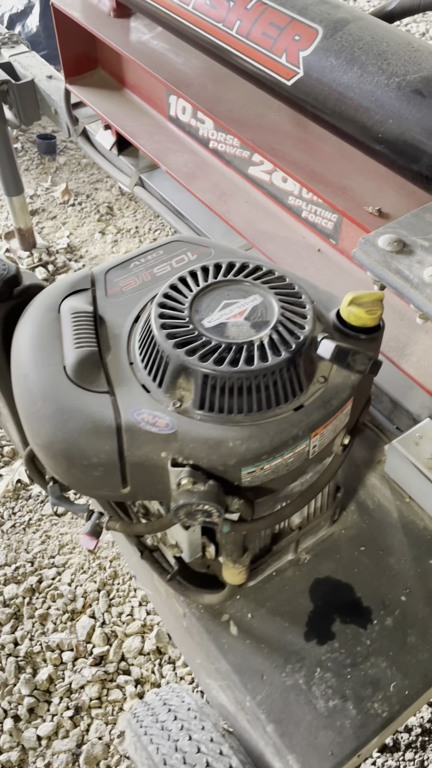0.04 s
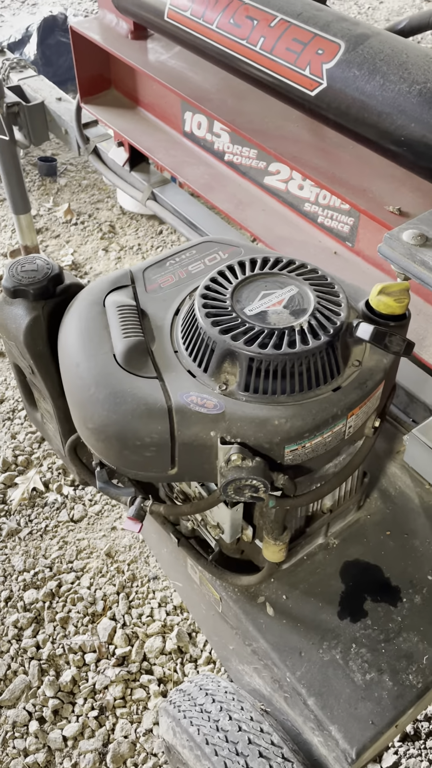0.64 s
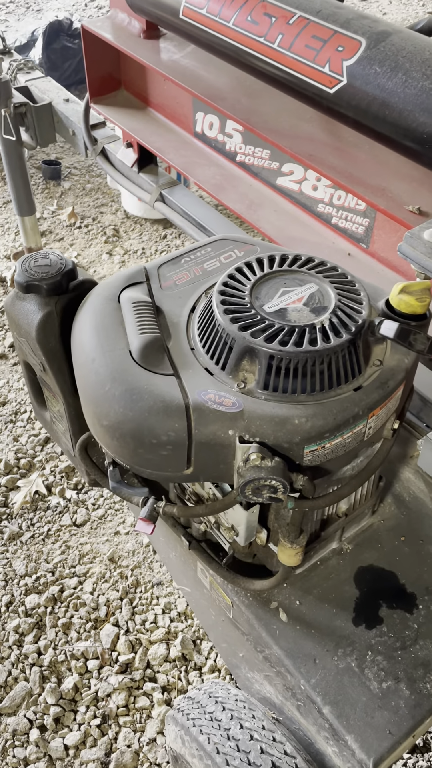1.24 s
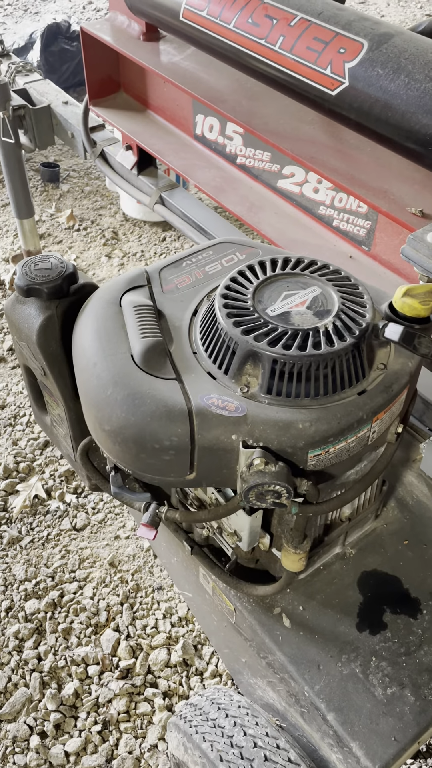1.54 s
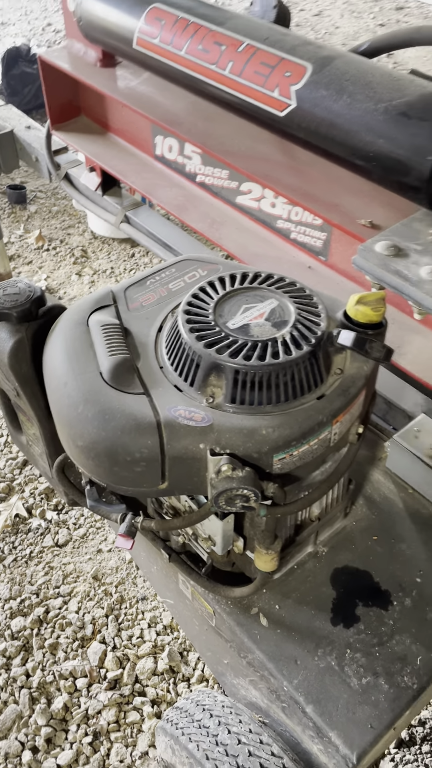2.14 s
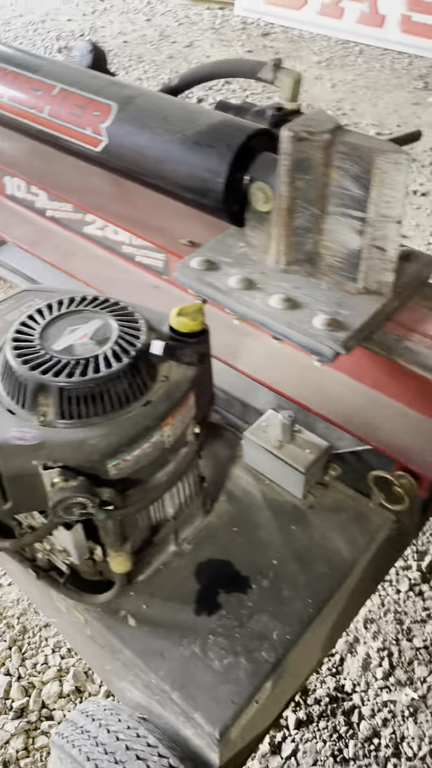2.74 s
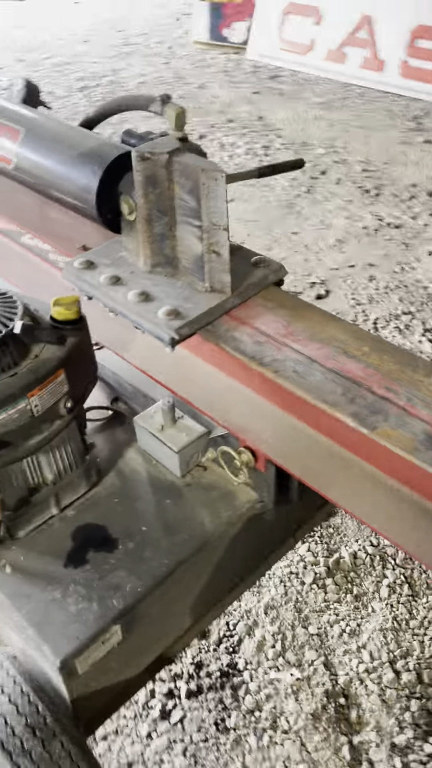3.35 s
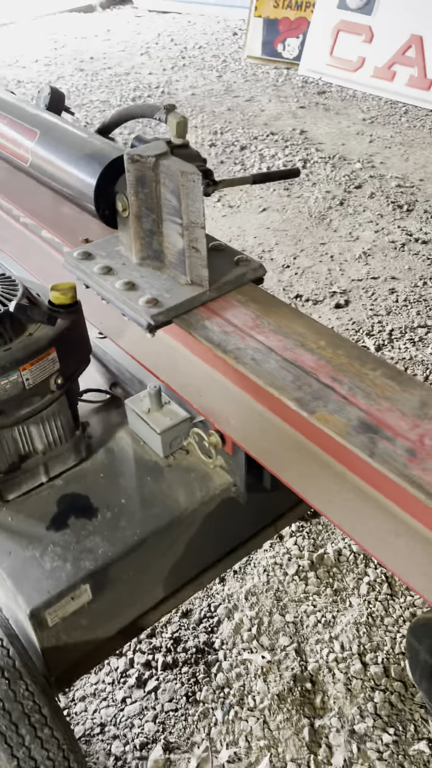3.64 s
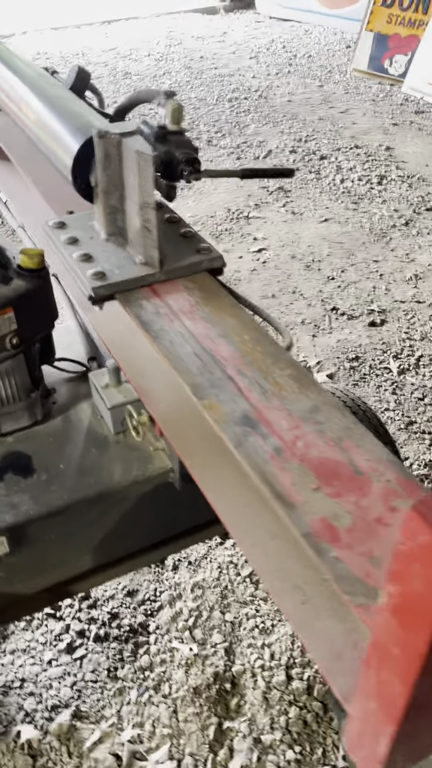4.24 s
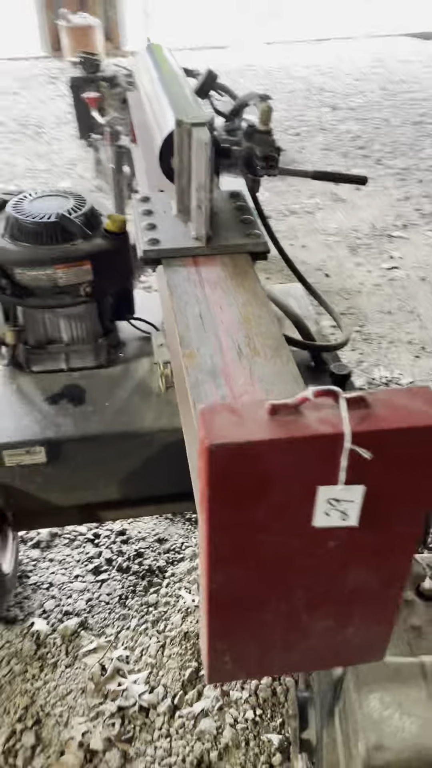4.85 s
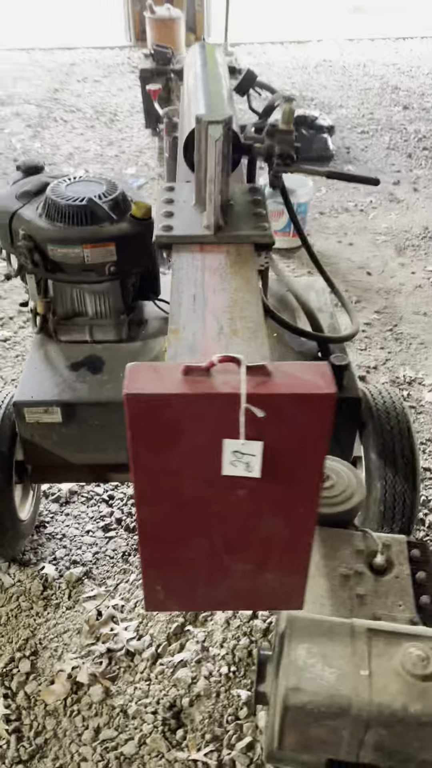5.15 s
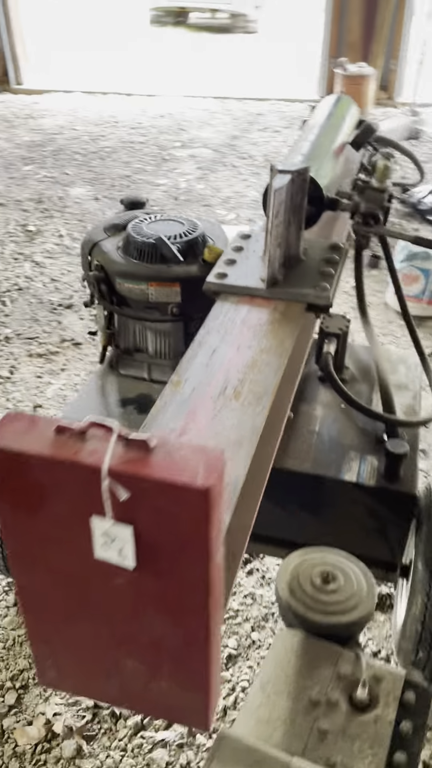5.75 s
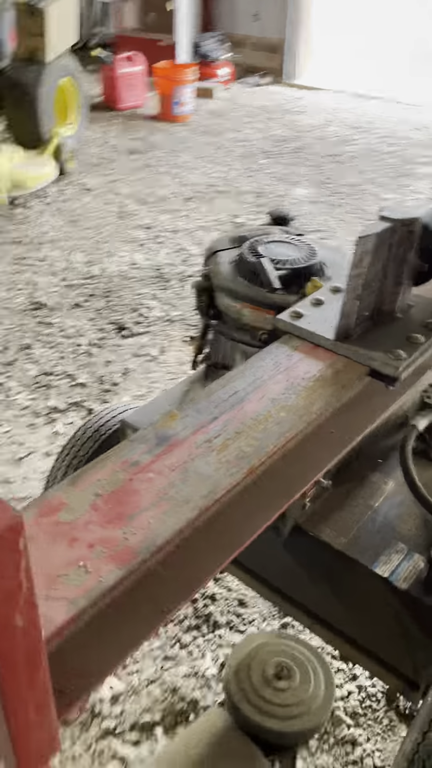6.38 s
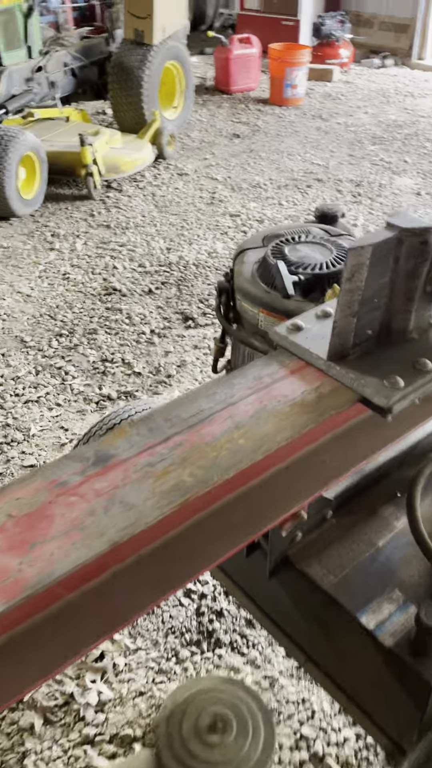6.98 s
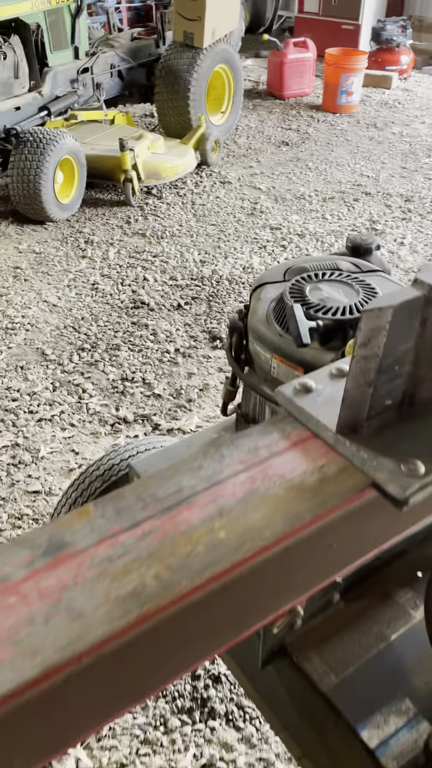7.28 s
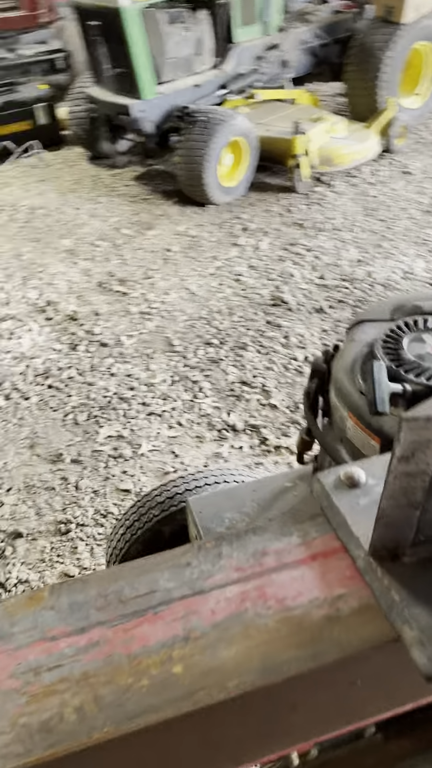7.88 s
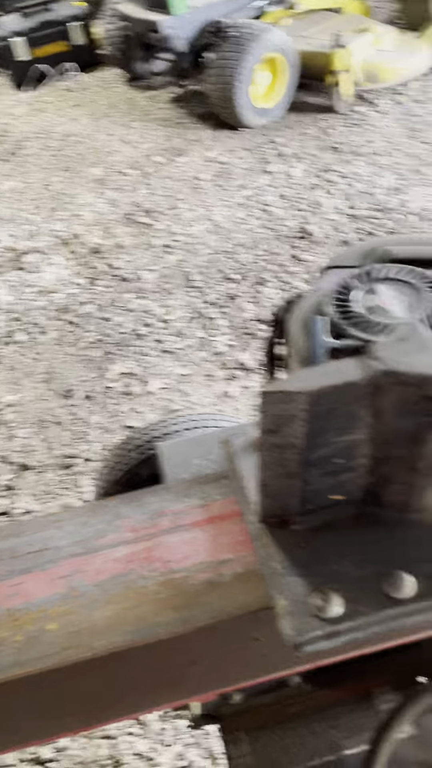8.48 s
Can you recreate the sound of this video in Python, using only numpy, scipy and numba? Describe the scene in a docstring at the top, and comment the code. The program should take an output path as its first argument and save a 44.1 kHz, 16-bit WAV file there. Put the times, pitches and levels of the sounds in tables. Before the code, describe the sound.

Steady, rapid chugging of a single-cylinder log splitter engine, with valve clatter, a thin whine and a few faint steps on gravel.

```python
"""A single-cylinder four-stroke petrol engine drives a log splitter at governed speed in a shed.
Exhaust and intake puffs ring the silencer and ducts, valves clatter, fan and pump whine, cooling air
rushes and loose steel jingles. The microphone is a phone, carried half a circle round the machine at
0.75 to 1.7 m, with gravel crunching underfoot. The walk changes how much of each part reaches it,
and narrow bands of the drone dip or swell on the way."""
import sys
import numpy as np
from scipy import signal
from scipy.fft import rfft, irfft, next_fast_len
from scipy.io import wavfile
from scipy.ndimage import uniform_filter1d, map_coordinates
from numba import njit

SR = 44100
rng = np.random.default_rng(int(sys.argv[2]) if len(sys.argv) > 2 else 0)


def int16_out(signal):
    """Quantize to a 16-bit WAV file."""
    q = np.round(np.clip(np.atleast_2d(signal).T, -1, 1) * 32767)
    wavfile.write(sys.argv[1], SR, q.astype(np.int16))


N = 380141
TIME_S = np.arange(N) / SR
COMPRESSION_AT, EXHAUST_AT, INTAKE_AT = .35, .68, .96  # places in the four-stroke cycle, 0-1


def undb(db):
    """Decibels to gain."""
    return 10 ** (np.asarray(db) / 20)

def unit(x):
    """Scale to rms 1."""
    return x / np.sqrt(np.mean(x ** 2))

def pan(db):
    """Left and right gains for a level difference."""
    return undb(np.array([[1], [-1]]) * db / 2)

def bell(x, centre, half_width):
    """A smooth hump, 1 at its centre."""
    return np.exp(-((x - centre) / half_width) ** 2)

def curves(table):
    """The columns of a timed table at every sample."""
    times, *columns = np.transpose(table)
    return [np.interp(TIME_S, times, column) for column in columns]

def drift(rate):
    """Smooth chance that changes about rate times a second."""
    hold = int(SR / rate)
    steps = np.repeat(rng.standard_normal(N // hold + 1), hold)
    return 2 * uniform_filter1d(uniform_filter1d(steps, hold), hold)[:N]

def noise(side_db):
    """Stereo noise; side_db is the level of what differs between left and right."""
    mid, side = rng.standard_normal((2, N))
    return unit(mid + undb(side_db) * np.array([side, -side]))

def filtered(x, response):
    """Apply a response given as a function of frequency."""
    size = next_fast_len(N + 4096)
    hz = np.arange(size // 2 + 1) * SR / size
    return irfft(rfft(x, size) * response(hz), size)[..., :N]

def colour(x, points):
    """Shape by (frequency [Hz], level [dB]) points; rms 1."""
    hz, db = np.transpose(points)
    return unit(filtered(x, lambda f: undb(np.interp(np.log(f + 1), np.log(hz), db, -80, -80))))

def delayed(x, ms):
    """Delay by a path whose length may change."""
    return map_coordinates(x, [np.arange(N) - ms * SR / 1000], order=1)

@njit
def resonate(x, hz, width_hz):
    """State-variable band-pass."""
    y, band_state, low_state = np.empty(len(x)), 0., 0.
    g, damping = np.tan(np.pi * hz / SR), width_hz / hz
    for i in range(len(x)):
        band = (band_state + g * (x[i] + 1e-18 - low_state)) / (1 + g * (g + damping))
        band_state = 2 * band - band_state
        low_state += 2 * g * band
        y[i] = damping * band
    return y

def cavity(x, hz, width_hz, skirt_hz):
    """A narrow resonance inside a wide one, so that its skirts fall steeply."""
    return unit(resonate(resonate(x, hz, width_hz), hz, skirt_hz))

def diffuse(x, t60_s, places):
    """Dense stereo ringing whose pattern changes from place to place along the walk."""
    t = np.arange(SR // 3) / SR
    position = np.linspace(0, places - 1, N)
    out = np.zeros((2, N))
    for place in range(places):
        tail = rng.standard_normal((2, len(t))) * np.exp(-np.log(1000) * t / t60_s)
        near = np.sqrt(np.clip(1 - abs(position - place), 0, 1))
        out += signal.oaconvolve((x * near)[None], tail, axes=1)[:, :N]
    return unit(out)

def since(cycle, place):
    """Fraction of a cycle since the engine last passed this place."""
    return (cycle - place) % 1

def pulses(cycle, place, scatter_db, jitter_s):
    """One pulse a cycle, each a little early or late, weak or strong."""
    due = np.arange(-1, int(cycle[-1]) + 1) + place
    due = due[(due > cycle[0] - .02) & (due < cycle[-1])]
    late, strong = rng.standard_normal((len(due), 2)).T
    at = np.interp(due, cycle, np.arange(N)) + jitter_s * SR * late
    return np.bincount(np.clip(at, 0, N - 1).astype(int), undb(scatter_db * strong), N)


# The microphone's walk round the engine: (time [s], distance [m], bearing [deg])
MIC_PATH = [(0, 0.75, 0), (.6, 0.77, 18), (2.2, 0.81, 18), (2.8, 0.8, 40), (3.3, 0.81, 57), (3.8, 1.01, 65),
            (4.5, 1.16, 92), (5.2, 1.73, 109), (5.6, 1.46, 116), (6.1, 1.23, 129), (6.8, 1.33, 151),
            (7.3, 1.01, 166), (7.8, 0.83, 176), (8.62, 0.76, 186)]
# How each part radiates; a negative lobe is a shadow: (level at 1 m [dB],
# loss per doubling of distance [dB], lobe bearing [deg], lobe half-width [deg], lobe gain [dB])
RADIATION = { "thud": (-28.5, 3, 132, 39, 3), "rumble": (-34.5, 4, 172, 44, 1.5),
             "casing": (-31.5, 6, 76, 22, -3), "clatter": (-34, 6, 178.5, 9, -5),
             "air": (-37, 0.1, 113, 14.5, -4), "hiss": (-39, 4, 159, 31, 3),
             "tick": (-51, 5.5, 46, 29, 15.5), "snap": (-53.5, -2, -4, 32, 12.5),
             "leak": (-57, 1, 168, 32, 9.5), }

def at_mic(part):
    """Gain of a part at the microphone, set by distance and by the side that faces it."""
    metres, bearing = curves(MIC_PATH)
    db, loss_db, facing, half_width, lobe_db = RADIATION[part]
    return undb(db - loss_db * np.log2(metres) + lobe_db * bell(bearing, facing, half_width))

# The piston's pressure wave: (multiple of the cycle rate, relative level [dB])
THUD_HARMONICS = [(2, 1), (3, 2), (4, -8), (5, 1.5), (6, -7), (7, -6)]

def piston_thud(cycle):
    """The piston pushes out a slow pressure wave that peaks at compression."""
    phase = 2 * np.pi * (cycle - COMPRESSION_AT)
    wave = sum(undb(db) * np.cos(k * phase) for k, db in THUD_HARMONICS)
    return unit(wave) * at_mic("thud") * undb(.26 * drift(6.9))

def puff(x, corner_hz):
    """A port opens gradually, so its puff has no sharp edge."""
    return filtered(x, lambda f: 1 / (1 + (f / corner_hz) ** 8))

# What the puffs ring, two for the exhaust, five for the intake: (frequency [Hz], width [Hz], skirt [Hz])
PUFF_CAVITIES = {"silencer": (237.2, 33, 230), "outlet": (305, 910, 1100), "mouth": (556, 250, 570),
                 "floor bounce": (465, 470, 710), "throat": (313, 137, 510), "duct": (357, 15.3, 810),
                 "air box": (620.5, 70, 404)}
# Their strength along the walk: (time [s], silencer [dB], outlet [dB], mouth [dB], floor bounce [dB],
# throat [dB], duct [dB], air box [dB])
CAVITY_LEVELS = [(0.5, -23.2, -30.5, -28.5, -33, -28.5, -35, -33.5),
                 (2.5, -22.5, -32, -27, -29, -30, -32, -40), (3.1, -24.2, -29, -26.5, -26, -27.0, -46, -31),
                 (3.7, -28.5, -30.5, -28.5, -25.5, -28, -53, -32),
                 (4.4, -31.5, -32, -30.5, -29, -33.5, -58, -30),
                 (5.0, -28.5, -32, -31.5, -31.5, -32.5, -43, -42),
                 (5.6, -28.5, -32.5, -33, -34, -31.5, -46, -38.5),
                 (6.3, -26, -31.5, -29.5, -35, -30.5, -55, -39),
                 (7.0, -26, -34.0, -32, -34, -28.5, -36.5, -38.5),
                 (7.7, -23, -35.5, -32, -26.5, -25.5, -30, -32.5),
                 (8.5, -20, -27.5, -36, -24.5, -25, -29, -26.5)]
# The intake's delays to the microphone:
# (time [s], mouth [ms], floor bounce [ms], throat [ms], duct [ms], air box [ms])
INTAKE_DELAYS = [(0.5, 0.56, 3.82, 4.6, 2.66, 4), (2.5, 0.6, 3.7, 4.6, 2.7, 3.86),
                 (3.1, 0.74, 3.5, 4.22, 2.1, 4.57), (3.7, 1.1, 3.58, 4.3, 2.45, 3.65),
                 (4.4, 1.02, 3.36, 4.19, 2.3, 3.13), (5.0, 1.35, 3.63, 4.06, 1.4, 3.6),
                 (5.6, 1.64, 3.68, 3.8, 2.4, 4), (6.3, 1.94, 4.28, 3.65, 0.82, 3.74),
                 (7.0, 1.81, 3.85, 4, 2.8, 3.54), (7.7, 1.65, 3.85, 4.26, 2.16, 3.67),
                 (8.5, 1.7, 4.13, 4.54, 2.4, 3.9)]
# Side on which intake mouth and air box are heard: (time [s], left minus right [dB])
AIR_BOX_PAN = [(0, 12), (2.6, 11), (3.3, 5), (3.7, -10), (4.6, 23), (6.7, 28), (7.6, 11), (8.62, 6)]

def exhaust_and_intake(cycle):
    """The exhaust rings the silencer; intake gulps arrive straight, off the floor and through ducts."""
    exhaust = puff(pulses(cycle, EXHAUST_AT, scatter_db=.58, jitter_s=3e-5), corner_hz=840)
    intake = puff(pulses(cycle, INTAKE_AT, scatter_db=.5, jitter_s=2e-5), corner_hz=800)
    arrivals = [delayed(exhaust, ms) for ms in (.6, .12)]  # silencer, outlet
    arrivals += [delayed(intake, ms) for ms in curves(INTAKE_DELAYS)]
    silencer, outlet, mouth, bounce, throat, duct, box = (
        cavity(x, *shape) * undb(db)
        for x, shape, db in zip(arrivals, PUFF_CAVITIES.values(), curves(CAVITY_LEVELS)))
    sides = pan(curves(AIR_BOX_PAN)[0])
    direct = outlet - silencer + throat - duct + bounce + (mouth + box) * sides / sides.mean(axis=0)
    shed = diffuse(undb(-4.5) * (outlet + bounce + throat) + mouth + box, t60_s=.49, places=9)
    return direct + undb(-32) * shed

# Turbulent gas: (frequency [Hz], relative level [dB])
RUMBLE_SPECTRUM = [(20, 5), (45, -29), (110, 1), (250, 1), (400, 6.5), (580, 5.5), (750, 3.5), (1000, -32),
                   (1500, -49)]

def gas_rumble(cycle):
    """Turbulence rumbles, strongest just after the intake opens."""
    swirl = 1 + .21 * np.exp(-since(cycle, INTAKE_AT) / .24)
    return colour(noise(-1.8) * swirl, RUMBLE_SPECTRUM) * at_mic("rumble")

def intake_snap(cycle, cycle_hz):
    """The intake valve opens with a short, bright crack."""
    strike = pulses(cycle, .976, scatter_db=1.2, jitter_s=3e-5)
    chatter = np.exp(-since(cycle, .965) / cycle_hz / .0018) * noise(-10)
    body = cavity(strike, hz=1460, width_hz=1600, skirt_hz=3000) + undb(3) * unit(chatter)
    return colour(body, [(700, -8), (1500, 6.5), (2500, -2), (4000, -1), (7000, -7)]) * at_mic("snap")

def exhaust_leak(cycle, cycle_hz):
    """Gas spits from the silencer after each firing, heard from behind the engine."""
    age = since(cycle, EXHAUST_AT) / cycle_hz / .0013  # the spit peaks after 1.3 ms
    spit = noise(-12) * age * np.exp(-age)
    spectrum = [(2500, -2), (4000, 2), (7000, -3), (8500, -16), (10000, -2), (14000, -1), (16000, -12)]
    return colour(spit, spectrum) * at_mic("leak")

# The blows in each cycle: (place [cycles], decay [s], relative clatter [dB], relative gas hiss [dB])
BLOWS = [(.375, .004, -8, -13), (.69, .005, -12, -8), (.925, .002, -6, -5), (.965, .006, -6, -1),
         (.08, .003, -12, -7)]

def valve_blows(cycle):
    """The valves strike the metal and set it ringing."""
    blows = sum(undb(db) * pulses(cycle, place, scatter_db=1.5, jitter_s=7e-5)
                for place, _, db, _ in BLOWS)
    ring = diffuse(blows, t60_s=.078, places=6)
    return unit(ring + .16 * ring[::-1])  # left and right share some of the ringing

def blow_envelopes(cycle, cycle_hz):
    """Envelopes of rattle and gas gush: each blow starts at its place in the cycle and dies away."""
    power = np.zeros((2, N))
    for place, decay_s, *levels_db in BLOWS:
        decay = np.exp(-since(cycle, place) / cycle_hz / decay_s)
        blow_number = np.floor(cycle - place).astype(int) + 2
        for row, db in enumerate(levels_db):
            scatter_db = rng.normal(0, 1.2, 300)[blow_number]
            power[row] += (undb(db + scatter_db) * decay) ** 2
    return [unit(envelope) for envelope in np.sqrt(power)]

# The engine casing: (frequency [Hz], relative level [dB])
CASING_SPECTRUM = [(500, -12), (750, -2.5), (950, -4.5), (1200, -4), (1450, -13.5), (1800, -12.5),
                   (2600, -51)]

def casing_ring(ring):
    """The struck casing rings in the midrange over a steady roar."""
    return colour(ring + undb(4) * noise(-1.4), CASING_SPECTRUM) * at_mic("casing")

# Valves and rattling parts: (frequency [Hz], relative level [dB])
CLATTER_SPECTRUM = [(900, -37), (1500, -0.5), (1800, 0), (2080, 3), (2400, -1), (2800, -6.5), (3600, -9),
                    (6000, -16.5), (12000, -79)]

def valve_clatter(ring, rattle):
    """Parts ring and rattle after each blow, over steady noise."""
    clatter = undb(-1.5) * ring + undb(-12.5) * rattle * noise(2.8) + noise(-23.5)
    return colour(clatter, CLATTER_SPECTRUM) * at_mic("clatter")

# Rushing air: (frequency [Hz], relative level [dB])
AIR_SPECTRUM = [(1500, -20), (2600, 6.5), (3200, 4.5), (4200, 0.5), (5200, 2.5), (5650, -4), (6400, 1.5),
                (7500, -3.5), (9500, -44), (15000, -21)]

def cooling_air(rattle, gush):
    """Cooling air rushes, swelling a little with each blow."""
    rush = noise(-1.1) * (1 + .2 * rattle + .088 * gush)
    return colour(rush, AIR_SPECTRUM) * at_mic("air") * undb(.5 * drift(5.2))

# Gas at the engine's ports: (frequency [Hz], relative level [dB])
HISS_SPECTRUM = [(3000, -12), (6000, -16.5), (8000, 3.5), (9500, 6.5), (11000, 0), (12500, -2), (13900, 0),
                 (15000, -1.5), (16000, -21)]

def port_hiss(gush):
    """Gas hisses at the engine's ports, surging with each gush."""
    return colour(noise(-47) * np.hypot(.95, gush), HISS_SPECTRUM) * at_mic("hiss")

def valve_tick(cycle, cycle_hz):
    """A valve drops on its seat once a cycle: a metallic tick, loudest beside the cylinder."""
    seats_at = .368
    strike = pulses(cycle, seats_at, scatter_db=.8, jitter_s=5e-5)
    chatter = np.exp(-since(cycle, seats_at) / cycle_hz / .0041) * noise(-14)
    body = cavity(strike, hz=2114, width_hz=330, skirt_hz=900) + undb(3) * unit(chatter)
    spectrum = [(1000, -2), (1600, 5), (2100, 1.5), (2500, -2), (3500, -12), (7000, -23)]
    return colour(body, spectrum) * at_mic("tick")

# The three main whines along the walk: (time [s], fan [dB], pump [dB], gear [dB])
MAIN_WHINES = [(0.1, -32, -36, -38.5), (.6, -32, -39, -39), (1.2, -34, -39, -37.5),
               (1.8, -33.5, -38.5, -36.5), (2.5, -32.5, -40, -40), (3.15, -34, -38, -36),
               (3.7, -51, -39.5, -45), (4.1, -40, -37.5, -45), (4.6, -43.5, -37.5, -41),
               (4.9, -41, -40.5, -47), (5.4, -42, -47, -56), (5.95, -39.5, -39, -49),
               (6.35, -47, -43.5, -49), (6.8, -44, -39.5, -42), (7.35, -47, -38, -48),
               (7.7, -43.5, -50, -35), (8.1, -51, -52, -37), (8.6, -52, -49, -43)]
# Weak tones of the rotating parts: (multiple of the cycle rate, level against the casing [dB])
WEAK_WHINES = [(32, -11.5), (35, -17), (36, -16), (37, -14.5), (40, -13.5), (46, -20), (52, -16), (54, -16),
               (56, -15.5), (58, -21)]

def whines(cycle):
    """Fan, pump and gears sing on multiples of the cycle rate; the tones waver in the moving air."""
    tones = list(zip((42, 44, 48), undb(curves(MAIN_WHINES))))
    tones += [(multiple, at_mic("casing") * undb(db)) for multiple, db in WEAK_WHINES]
    out = 0
    for multiple, gain in tones:
        phase = 2 * np.pi * multiple * cycle + .33 * drift(45)
        spread_rad = .2 * drift(1.24)
        flutter = undb(drift(14))
        out += gain * flutter * np.sqrt(2) * np.sin([phase + spread_rad, phase - spread_rad])
    return out

# Narrow bands of the engine's drone that dip or swell along the walk:
# (time [s], half-length [s], frequency [Hz], width [Hz], gain [dB])
DRONE_BANDS = [(1.0, 1.6, 391, 24, -2.5), (1.0, 1, 746, 40, -2), (3.0, 1.4, 462, 12, 4),
               (3.7, 0.75, 619, 15, -4), (3.802, 0.59, 767, 27, 6), (4.0, 0.63, 390, 45, -3.5),
               (4.6, 0.57, 547, 21, 5), (4.7, 0.54, 333, 15, 4), (5.0, .4, 415, 13, -11),
               (5.55, 0.75, 251.7, 15, -17), (5.7, .9, 476, 26, 4), (5.4, 0.73, 560, 20, 4.5),
               (5.6, 0.88, 697, 25, 6.5), (6.707, 0.52, 448, 24, 4), (7.6, 1.2, 334, 12, 9.5),
               (7.8, 1.7, 564, 18, 5.5), (7.5, 0.5, 678, 22, 5), (8.054, 0.92, 168, 16, -16)]

def band_swells(x):
    """Each narrow band of the drone sinks or rises for a while, then returns."""
    for at_s, half_s, hz, width_hz, db in DRONE_BANDS:
        band = np.array([resonate(side, hz, width_hz) for side in x])
        x = x + (undb(db * bell(TIME_S, at_s, half_s)) - 1) * band
    return x

# Loose steel parts: (peak time [s], half-length [s], frequency [Hz], width [Hz], level [dB])
LOOSE_STEEL = [(2.7, 2.2, 5260, 141, -50), (3.75, .2, 3990, 70, -49), (4.3, 0.35, 2240, 60, -43),
               (6.7, .9, 5330, 145, -56), (7.35, .2, 3370, 60, -50), (7.35, .022, 3430, 30, -37)]

def jingles(cycle):
    """The firings shake loose pieces of steel, which buzz softly, swell and die away."""
    shakes = rng.standard_normal(N) * np.exp(-since(cycle, EXHAUST_AT) / .38)
    return sum(cavity(shakes, hz, width_hz, skirt_hz=700) * undb(db) * bell(TIME_S, at_s, half_s)
               for at_s, half_s, hz, width_hz, db in LOOSE_STEEL)

# Gravel shifting underfoot, below the microphone: (time [s], level [dB])
GRAVEL_STEPS = [(4.28, -41), (6.81, -39), (7.29, -41), (7.49, -41)]

def footsteps(decay_s=.018):
    """Stones grind together under a shoe in a short spray of clicks."""
    press = sum(undb(db) * (TIME_S > at_s) * np.exp(-abs(TIME_S - at_s) / decay_s)
                for at_s, db in GRAVEL_STEPS)
    grains = noise(1) * undb(3 * rng.exponential(size=N))
    return press * colour(grains, [(2000, -6), (5000, 0), (9000, 0), (15000, -7)])

# Governed speed, hunting a little before it settles: (time [s], four-stroke cycle rate [Hz])
ENGINE_SPEED = [(0.0, 27.684), (0.389, 27.862), (0.565, 28.342), (0.759, 27.825), (0.918, 28.1),
                (1.142, 28.078), (1.243, 27.912), (1.484, 28.222), (1.835, 27.783), (2.106, 28.117),
                (2.184, 27.938), (2.857, 27.939), (3.002, 28.038), (3.963, 28.039), (4.162, 27.967),
                (5.051, 28.108), (5.253, 27.898), (5.565, 28.207), (5.736, 27.956), (6.225, 28.028),
                (7.559, 28.069), (7.63, 28.005), (8.6, 28.043)]
GOVERNED_HZ, THROTTLE_DB_PER_HZ = 28.02, 4.5

def scene():
    """One crankshaft drives the machine; when its speed sags the governor opens the throttle."""
    cycle_hz, = curves(ENGINE_SPEED)
    cycle = np.cumsum(cycle_hz) / SR - .028  # running count of four-stroke cycles
    throttle = undb(THROTTLE_DB_PER_HZ * (GOVERNED_HZ - cycle_hz))
    drone = exhaust_and_intake(cycle) + gas_rumble(cycle) + piston_thud(cycle)
    gas = band_swells(drone) + intake_snap(cycle, cycle_hz) + exhaust_leak(cycle, cycle_hz)
    ring = valve_blows(cycle)
    rattle, gush = blow_envelopes(cycle, cycle_hz)
    machinery = casing_ring(ring) + valve_clatter(ring, rattle) + cooling_air(rattle, gush)
    centred = port_hiss(gush) + valve_tick(cycle, cycle_hz)
    leftish = (machinery + whines(cycle)) * pan(db=1.5)
    return gas * throttle + centred + leftish + jingles(cycle) + footsteps()

# Left-right phase of the treble, wide near 8 kHz, centred above 13 kHz:
# (frequency [Hz], phase lead of the left [rad])
TREBLE_PHASE = [(0, 0), (2300, 0), (3100, .7), (5100, .5), (5700, -1.1), (6500, -1), (7700, -2.7),
                (8600, -3.15), (9500, -3.8), (11000, -4.5), (12200, -5.5), (13200, -6.28)]

def record(dry):
    """Part of the treble is out of step between left and right; the phone cuts the top."""
    hz, lead = np.transpose(TREBLE_PHASE)
    left = filtered(dry[0], lambda f: np.exp(1j * np.interp(f, hz, lead)))
    top_cut = signal.ellip(10, .2, 80, 15600, fs=SR, output="sos")
    return signal.sosfilt(top_cut, np.array([left, dry[1]]))


dry = scene()
out = record(dry)
int16_out(out)
```